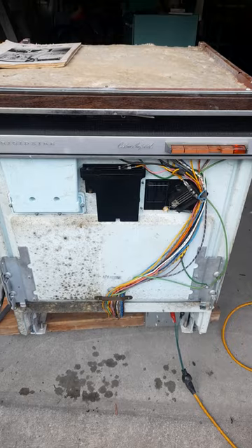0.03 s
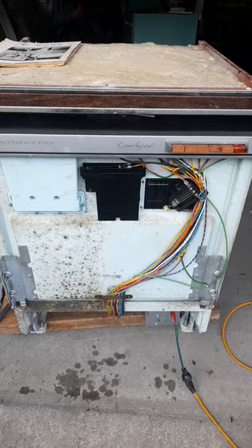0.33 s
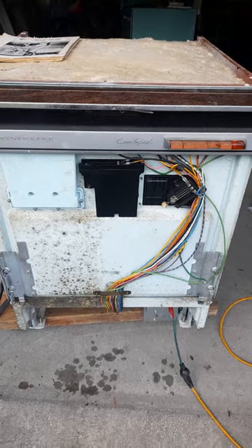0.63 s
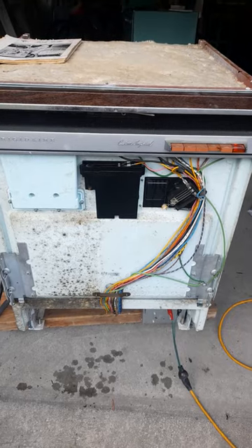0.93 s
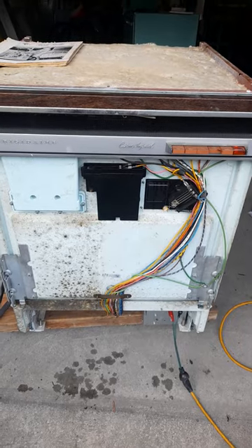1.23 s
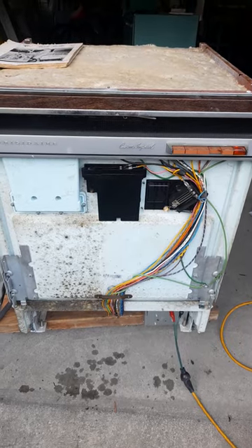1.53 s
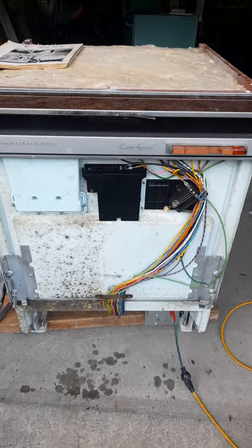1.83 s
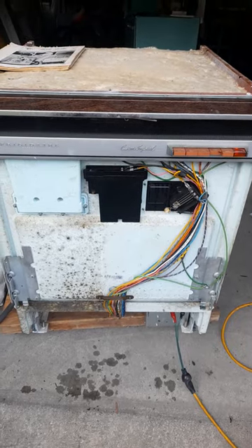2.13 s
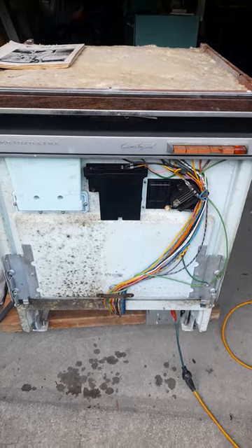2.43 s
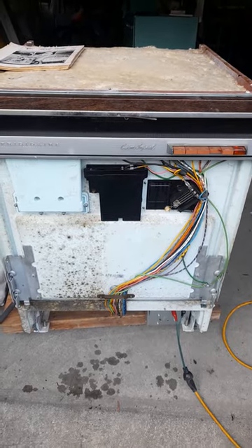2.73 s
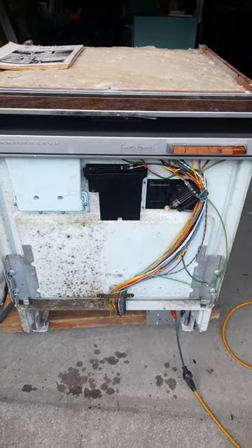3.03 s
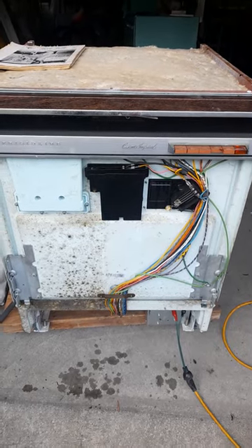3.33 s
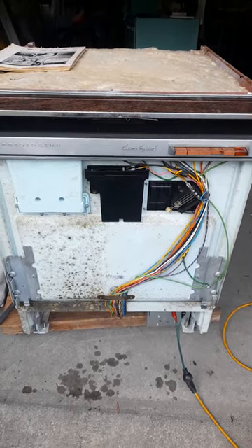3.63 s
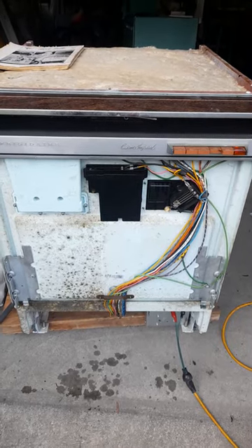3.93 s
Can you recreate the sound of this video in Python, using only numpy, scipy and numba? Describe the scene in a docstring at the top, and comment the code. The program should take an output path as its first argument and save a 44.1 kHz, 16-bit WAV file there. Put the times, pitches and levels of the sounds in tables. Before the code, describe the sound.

An old dishwasher's timer hums and buzzes faintly, close by in a quiet room, with a few soft microphone bumps in the first second. At about 2.7 seconds a quick cluster of sharp clicks starts the pump droning. From 3 seconds a rising, slightly whistling swish builds into loud water rushing and drumming in the steel tub. A jet slaps the wall near 3.7 seconds, and spraying continues until 4.

```python
"""Old dishwasher starting up

Two microphones close to the machine, its front panel off, in a quiet room. The timer motor hums and
buzzes at twice the mains rate, and a few soft handling bumps reach the left microphone. The contacts
snap over and the pump starts: water climbs the spray arm with a rising swish, then drums round the
steel tub."""
import sys
import numpy as np
from scipy import signal
from scipy.fft import rfft, irfft
from scipy.io import wavfile
from scipy.ndimage import uniform_filter1d, map_coordinates
from numba import njit

SR = 44100
rng = np.random.default_rng(int(sys.argv[2]) if len(sys.argv) > 2 else 0)


def to_wav(sig):
    """Store sig (one row per channel, or 1-D mono) as 16-bit WAV at the path in sys.argv[1].

    Samples outside -1..1 are clipped; the rate is SR.
    """
    pcm = np.clip(np.atleast_2d(sig), -1, 1) * 32767
    pcm = np.round(pcm).astype(np.int16)
    wavfile.write(sys.argv[1], SR, pcm.T)  # frames by channels


N = 176400
T = np.arange(N) / SR
FREQS = np.maximum(np.arange(N // 2 + 1) * SR / N, 1)
HUM_HZ = 119.97  # twice the mains rate


def undb(db):
    """Decibels to gain."""
    return 10 ** (np.asarray(db) / 20)


def unit(x):
    """Scale to rms 1."""
    return x / np.sqrt(np.mean(x ** 2))


def pan(db):
    """Gains that put the left microphone db above the right."""
    return undb(np.array([[db], [-db]]) / 2)


def walk(rate):
    """Smooth random drift with a spread near 1, taking rate steps a second."""
    hold = int(SR / rate)
    steps = np.repeat(rng.standard_normal(N // hold + 1), hold)
    return 1.3 * uniform_filter1d(uniform_filter1d(steps, hold), hold)[:N]


def noise():
    """Unrelated white noise for the two microphones."""
    return rng.standard_normal((2, N))


def colour(x, table):
    """Shape white sound of rms 1 to a left and right spectrum that falls away beyond its ends."""
    hz, *sides = np.array(table, float).T
    ends = 1 / np.maximum(1, np.maximum(hz[0] / FREQS, FREQS / hz[-1])) ** 3
    gain = undb([np.interp(np.log(FREQS), np.log(hz), side) for side in sides]) * ends
    return irfft(rfft(x) * gain, N) * np.sqrt(SR / 2)


def spaced(x, alike_hz):
    """A closely spaced pair of microphones: alike in the bass, unrelated in the treble."""
    mid, side = rfft(x)
    alike = .97 / (1 + (FREQS / alike_hz) ** 3)
    return irfft(mid * np.sqrt((1 + alike) / 2) + side * np.sqrt((1 - alike) / 2) * [[1], [-1]], N)


def ring(modes):
    """Decaying modes of a struck body, with their own phases at each microphone."""
    t, out = T[:SR // 2], 0
    for hz, db, t60 in modes:
        phase = min(hz / 1500, 1) * rng.random((2, 1))
        out += undb(db - 60 * t / t60) * np.sin(2 * np.pi * (hz * t + phase))
    return out


def through(x, response):
    """Play a sound through an impulse response."""
    return signal.fftconvolve(x, response, axes=-1)[:, :N]


def high_pass(x, hz):
    """Remove the bass."""
    return signal.sosfilt(signal.butter(3, hz, "high", fs=SR, output="sos"), x)


def add(out, start, x):
    """Mix a sound in at a time in seconds."""
    i = int(start * SR)
    out[:, i:i + x.shape[-1]] += x[..., :N - i]


@njit
def band_pass(x, hz, width_hz):
    """State-variable band-pass with a moving centre."""
    y, band_state, low_state = np.empty(len(x)), 0., 0.
    for i in range(len(x)):
        g, damping = np.tan(np.pi * hz[i] / SR), width_hz / hz[i]
        band = (band_state + g * (x[i] - low_state)) / (1 + g * (g + damping))
        band_state = 2 * band - band_state
        low_state += 2 * g * band
        y[i] = damping * band
    return y


def resonance(hz, width_hz):
    """Noise through two band-passes in a row, rms 1."""
    hz = hz * np.ones(N)
    once = band_pass(rng.standard_normal(N), hz, float(width_hz))
    return unit(band_pass(once, hz, float(width_hz)))


def tone(hz, waver, rate):
    """A tone of rms 1 whose pitch wavers by a share of itself."""
    pitch = hz * (1 + waver * walk(rate))
    return np.sqrt(2) * np.sin(2 * np.pi * np.cumsum(pitch) / SR)


def room_air():
    """The low, gently wavering air of the room."""
    # (frequency [Hz], left [dB per Hz], right [dB per Hz])
    spectrum = [(52,-97.5,-83.5), (85,-82,-95.5), (170,-106.5,-91), (297,-87.5,-99), (410,-89.5,-103),
                (675,-101,-101), (1190,-103,-102)]
    return colour(spaced(noise(), alike_hz=480), spectrum) * undb(2.1 * walk(8.2))


def timer_hum():
    """The timer motor hums with the mains; a narrow resonance of the housing drones beside it."""
    # partials of the hum (multiple of HUM_HZ, relative level [dB])
    partials = [(1, -4), (2, -16), (3, 0.5), (4, -9), (6, -13), (7, -3.5), (8, -16.5), (9, -20),
                (13, -15.5), (14, -21.5)]
    hum = 0
    for multiple, db in partials:
        hum += undb(db + .6 * walk(5.55)) * np.sin(2 * np.pi * (multiple * HUM_HZ * T + rng.random()))
    housing = undb(-77) * pan(-30) * resonance(331.7, width_hz=4.2)
    return undb(-61.5) * unit(hum) + housing


def rattle():
    """A strike on every half cycle of the mains; all but its top partly repeats from one to the next."""
    decay_cycles, repeat_below_hz = .19, 8500
    phase = (HUM_HZ * T + .0494) % 1
    position = phase * SR / HUM_HZ
    repeated = np.array([map_coordinates(n, [position], order=3, mode="wrap") for n in noise()[:, :1024]])
    share = .58 / np.sqrt(1 + (FREQS / repeat_below_hz) ** 8)
    grain = irfft(share * rfft(repeated) + np.sqrt(1 - share ** 2) * rfft(noise()), N)
    return unit(grain * (.5 + np.exp(-phase / decay_cycles)))


def timer_buzz():
    """The motor's rattle rings the timer case, favouring other modes as the gears turn."""
    # modes of the case (frequency [Hz], relative level [dB], t60 [s])
    case_modes = [(5420, -4.5, 0.0097), (6080, 5, 0.007), (6980, 4.5, 0.0061), (8020, 2.5, 0.0062),
                  (9050, -4, 0.0056), (11050, -0.5, 0.0049), (12220, 4, .006)]
    # colour of the buzz (frequency [Hz], left [dB], right [dB])
    spectrum = [(1080, -104, -103), (1290, -100, -101), (1480, -103, -97), (2040, -105, -99),
                (2840, -109, -108), (3300, -102, -110), (4950, -104, -115), (5200, -98.5, -114),
                (6100, -98, -117), (6760, -97, -125), (7860, -99, -128), (8840, -97.5, -122),
                (9900, -102, -120), (10700, -96.5, -116), (11700, -100.5, -116), (12400, -98, -114),
                (13600, -101, -114), (15700, -107, -118)]
    # the buzz eases about once per gear turn (time [s], depth on the left [dB], recovery [s])
    dips = [(.9, -4, 0.082), (1.655, -5.5, 0.077), (2.31, -4.5, 0.16)]
    strikes = rattle()
    case = sum(through(strikes, ring([mode])) * undb(2.2 * walk(8.84)) for mode in case_modes)
    buzz = colour(unit(rattle() + undb(-4) * unit(case)), spectrum)
    dip_db = sum(db * np.exp(-np.maximum((T - s) / back, (s - T) / .026) ** 2) for s, db, back in dips)
    return buzz * undb(1 + dip_db * np.array([[1], [.4]]) + .5 * walk(31.73))


def handling():
    """Soft pushes on the left microphone, a rumble that settles, and tiny dry ticks on the right."""
    # pushes (time [s], level [dB], half-width [s])
    bumps = [(0.059, -23.5, 0.0038), (0.093, -33, 0.0057), (0.122, -28, 0.0045), (0.189, -29.5, 0.0039),
             (0.314, -33, 0.0035), (0.363, -35.5, 0.0044), (0.713, -36.5, 0.0042), (0.734, -39.5, 0.0042)]
    # ticks (time [s], level [dB])
    ticks = [(0.5839, -36), (0.62, -36.5)]
    tick_s, settle_s = .0001, .4
    out = np.zeros((2, N))
    for s, db, width in bumps:
        u = (T - s) / width
        out -= undb(db) * (1 - 2 * u ** 2) * np.exp(-u ** 2) * undb([[0], [-22]])
    for s, db in ticks:
        add(out, s, undb(db) * undb([[-16], [0]]) * np.exp(-(T[:400] / tick_s - 2) ** 2))
    rumble = undb(-53) * pan(11.3) * resonance(71, width_hz=144) * np.exp(-T / settle_s)
    return high_pass(out + rumble, 44)


def rustles():
    """Soft swishes swell and fade to the right, most of them with the handling."""
    # swishes (time [s], centre [Hz], level [dB], half-width [s])
    swells = [(.135, 1280, -68.5, 0.031), (.35, 1230, -70, 0.07), (0.815, 1190, -67.5, 0.084),
              (1.89, 1320, -73, .04)]
    out = 0
    for s, hz, db, width in swells:
        out += undb(db) * np.exp(-((T - s) / width) ** 2 / 2) * resonance(hz, width_hz=290)
    return pan(-7) * out


def gear_whine():
    """The timer gears whine thinly, well to the left."""
    # course of the whine (time [s], level [dB])
    levels = [(.22, -79), (.27, -74), (.35, -83), (.5, -76), (.75, -75), (.9, -81.5), (2.6, -83.5)]
    gain = undb(np.interp(T, *np.array(levels).T, left=-120))
    return pan(14.5) * resonance(3485, width_hz=55) * gain


def contacts():
    """Each snap of the contacts is a short crack that rings the timer and the sheet metal behind it."""
    # snaps (time [s], crack [dB], timer ring [dB], panel ring [dB])
    snaps = [(2.668, -34.5, -28, -57), (2.732, -39.5, -43, -46.5), (2.752, -31.5, -43, -55),
             (2.756, -33.5, -43, -45.5), (2.772, -36, -53, -45.5), (2.829, -44, -60, -50.5),
             (2.921, -34, -36.5, -52), (2.926, -44, -49, -46.5)]
    # colour of the crack (frequency [Hz], relative left [dB], relative right [dB])
    spectrum = [(302, -9, -6.5), (880, 1, 0), (2530, 0, 5.5), (3660, -2, -8.5), (4850, 5, -10),
                (5970, -0.5, -19), (7500, -3, -45), (10200, 0.5, -23), (12600, 3.5, -16), (15500, -9, -18)]
    # modes of the timer and of the sheet metal (frequency [Hz], relative level [dB], t60 [s])
    timer_modes = [(1370, -19, .06), (1538, 0.5, 0.041), (1597, -10, .19), (1685, -15, .07),
                   (2070, -13, 0.056), (2180, -21, 0.041), (7690, -2, 0.014)]
    panel_modes = [(357, -10.5, .45), (711, -0.5, 0.29), (795, -4.5, 0.17), (955, -9, 0.18),
                   (1395, 0, 0.087), (2230, -7, .12), (2463, -5, .13)]
    rise_s, decay_s, tail_s = .0014, .0075, .059
    out, t = np.zeros((2, N)), T[:SR // 2]
    rise = 1 - np.exp(-t / rise_s)
    fall = np.exp(-t / decay_s) + undb(-21) * np.exp(-t / tail_s)
    for s, crack_db, timer_db, panel_db in snaps:
        crack = undb(crack_db) * unit(colour(noise(), spectrum))[:, :len(t)] * fall
        ringing = undb(timer_db) * ring(timer_modes) + undb(panel_db) * ring(panel_modes)
        add(out, s, rise * (crack + ringing))
    return out


def spray():
    """Dense drops of uneven size over a smooth rush."""
    drops_per_s, drop_share = 1200, .53
    impacts = (rng.random((2, N)) < drops_per_s / SR) * np.sign(noise())
    drops = impacts * undb(2 * np.minimum(rng.exponential(size=(2, N)), 5))
    return spaced(np.sqrt(drop_share) * unit(drops) + np.sqrt(1 - drop_share) * noise(), alike_hz=460)


def tub_wash():
    """Steady spray beats on the steel tub, which rings and echoes briefly."""
    # colour of water in the tub (frequency [Hz], relative left [dB], relative right [dB])
    spectrum = [(30.5,-98,-92), (45.7,-65,-70), (64,-57,-52.5), (163,-53.5,-53.5), (200,-64,-60.5),
                (302,-67,-59.5), (500,-60.5,-63), (595,-64.5,-63.5), (970,-65.5,-64.5), (1480,-68.5,-66.5),
                (1870,-72,-62.5), (2510,-71.5,-73), (3160,-76.5,-84), (5140,-76.5,-91), (7130,-78,-113),
                (9600,-84.5,-112), (13000,-83,-101), (15400,-88.5,-104)]
    # modes of the tub (frequency [Hz], relative level [dB], t60 [s])
    tub_modes = [(135, -4, 0.2), (257.4, -8.5, 0.18), (309.8, -1, 0.43), (491, -3, 0.16), (672, -10, 0.23),
                 (743, -4.5, 0.46), (834, -5.5, 0.4), (913, -12.5, 0.66), (991, -2.5, 0.54),
                 (1470, -1.5, 0.33), (1840, -5, 0.088), (1976, 0, 0.23)]
    echo_t60_s = .068
    hits = spray()
    response = noise()[:, :SR // 2] * undb(-60 * T[:SR // 2] / echo_t60_s)
    echo = unit(high_pass(through(hits, response), 600))
    wash = colour(hits + undb(-6) * echo, spectrum)
    steel = pan(1.1) * high_pass(through(spray(), ring(tub_modes)), 95)
    return unit(wash) + undb(-9) * unit(steel)


def water():
    """The wash builds in surges, flickering band by band; the finest spray grows faster than the flow."""
    # course of the flow (time [s], bass [dB], low mids [dB], high mids [dB], treble [dB])
    flow = [(2.74, -73, -81, -78, -77), (2.8, -68, -51.5, -51.5, -55.5), (2.85, -53, -57, -57.5, -61),
            (2.91, -51.5, -58.5, -57.5, -65), (2.98, -61, -53.5, -52, -58.5),
            (3.05, -48, -52.5, -48, -55.5), (3.12, -50.5, -43.5, -50, -49.5), (3.2, -45, -41, -43, -50.5),
            (3.27, -45.5, -36, -38.5, -45), (3.35, -34.5, -31.5, -37.5, -44.5),
            (3.5, -38, -35, -39.5, -46.5), (3.59, -43.5, -43, -44.5, -51.5), (3.66, -44, -41, -40.5, -51),
            (3.688, -36.5, -34, -35, -46), (3.76, -36.5, -35, -37.5, -47.5),
            (3.84, -42, -39.5, -38.5, -49.5), (3.92, -39, -38, -39, -46.5), (4.0, -34.5, -38, -42, -48.5)]
    # limits of those four bands (frequency [Hz])
    edges = [42, 220, 1150, 3200, 16000]
    trim_db, flicker_db = .98, 1.25
    sizzle_hz, threshold_db, extra_db_per_db = 10500, -53.5, .58
    spectrum = rfft(tub_wash())
    times, *levels = np.array(flow).T
    out = 0
    for lo, hi, db in zip(edges, edges[1:], levels):
        band = unit(irfft(spectrum * (FREQS >= lo) * (FREQS < hi), N))
        out += band * undb(trim_db + np.interp(T, times, db, left=-120) + flicker_db * walk(35))
    sizzle = irfft(rfft(out) / (1 + (sizzle_hz / FREQS) ** 8), N)
    boost_db = extra_db_per_db * np.maximum(np.interp(T, times, levels[-1]) - threshold_db, 0)
    return out + sizzle * (undb(boost_db) - 1)


def pump():
    """The loaded motor drones until it reaches speed; then the first surge of water booms in the tub."""
    # drone of the motor as it runs up (time [s], level [dB])
    run_up = [(2.78, -70), (2.84, -52.5), (2.91, -61.5), (3.055, -53), (3.105, -57), (3.14, -47),
              (3.205, -36), (3.25, -43), (3.29, -60)]
    surge_s, surge_width_s = 3.35, .055
    drone_db = np.interp(T, *np.array(run_up).T, left=-120, right=-120) + 1.1 * walk(26.7)
    boom = undb(-34) * np.exp(-((T - surge_s) / surge_width_s) ** 2) * tone(137.2, waver=.06, rate=60)
    drone = undb(drone_db) * tone(121.9, waver=.02, rate=40)
    return pan(-2.9) * (drone + boom)


def arm_swish():
    """Air driven out of the spray arm hisses with a hint of a whistle, higher as the arm fills."""
    # resonance of the filling arm (time [s], centre [Hz], level [dB])
    sweep = [(3.0, 837.3, -49), (3.028, 850, -38.5), (3.052, 1010, -36.5), (3.095, 1297, -39.5),
             (3.12, 1460, -30.5), (3.164, 1540, -36.5), (3.2, 1690, -36), (3.255, 1842, -40),
             (3.31, 2000, -51)]
    whistle_share, width_hz = .36, 420
    times, hz, db = np.array(sweep).T
    centre = np.interp(T, times, hz)
    gain = undb(np.interp(T, times, db, left=-120, right=-120))
    whistle = np.sqrt(whistle_share) * tone(centre, waver=.045, rate=300)
    hiss = np.sqrt(1 - whistle_share) * np.array([resonance(centre, width_hz) for _ in range(2)])
    # the overtone shows when the swish is loudest
    overtone = undb(-13.5) * np.sqrt(gain / gain.max()) * resonance(centre * 1.864, width_hz / 2)
    return (whistle + hiss + overtone) * pan(-1.5) * gain


def jet_slap():
    """A jet swings round and strikes the wall of the tub."""
    # colour of the slap (frequency [Hz], relative left [dB], relative right [dB])
    spectrum = [(900, -18, -23), (1870, 8, 12.5), (2800, 0, -5), (4000, -5, -17), (7000, -15, -42)]
    start_s, rise_s, decay_s = 3.673, .0032, .044
    t = np.maximum(T - start_s, 0)
    envelope = (1 - np.exp(-t / rise_s)) * np.exp(-t / decay_s)
    return undb(-29) * unit(colour(spray(), spectrum)) * envelope


def scene():
    """Close to the open front: the timer runs in a quiet room, then switches the wash on."""
    fade_in = np.clip((T - .035) / .015, 0, 1)
    quiet = room_air() + gear_whine() + timer_hum() + timer_buzz() + rustles() + handling()
    return quiet * fade_in + contacts() + pump() + water() + arm_swish() + jet_slap()


def record(dry):
    """Sound reaches the right microphone a few samples late; the recorder cuts the top."""
    lag_samples, top_hz = 5, 15900
    pair = np.array([dry[0], np.pad(dry[1], (lag_samples, 0))[:N]])
    return signal.sosfilt(signal.ellip(10, .2, 70, top_hz, fs=SR, output="sos"), pair)


dry = scene()
out = record(dry)
to_wav(out)
```